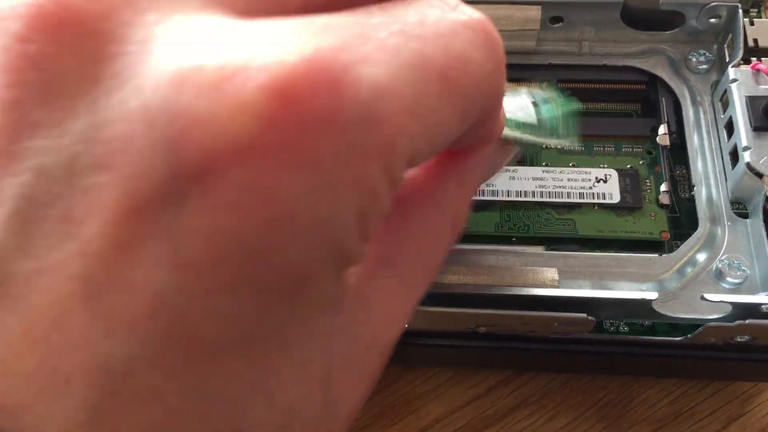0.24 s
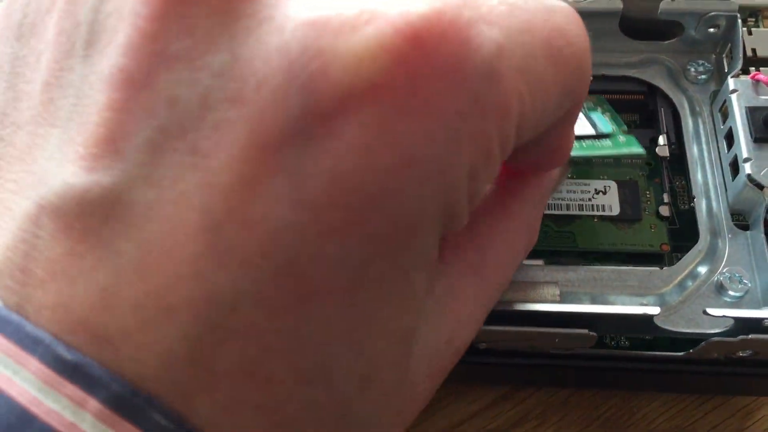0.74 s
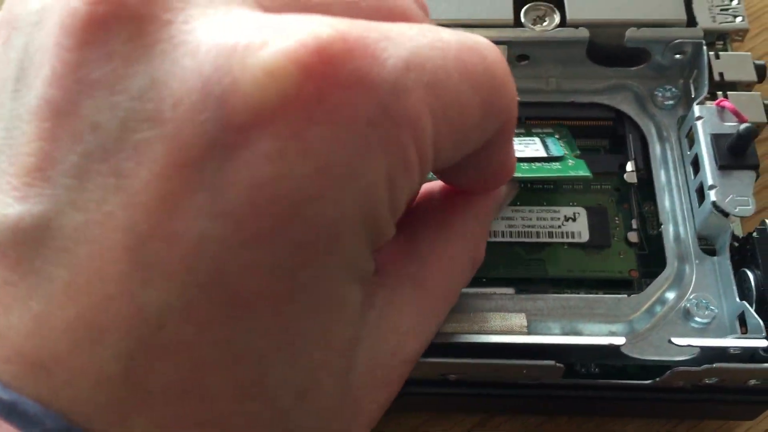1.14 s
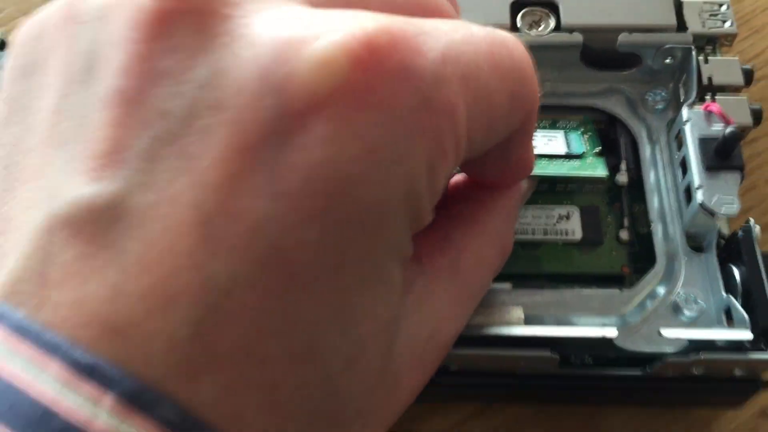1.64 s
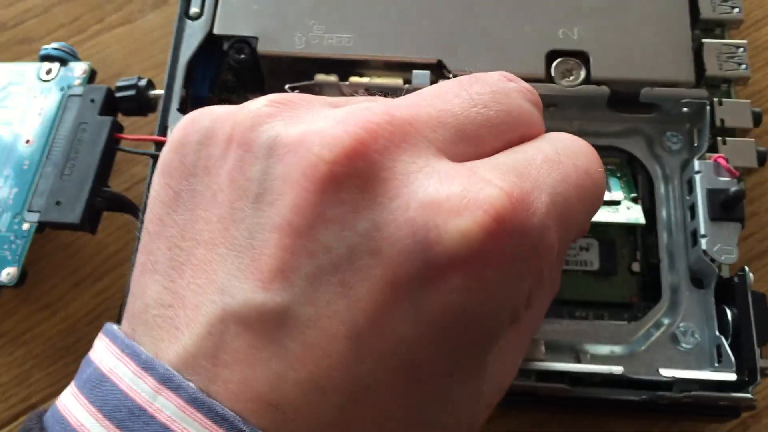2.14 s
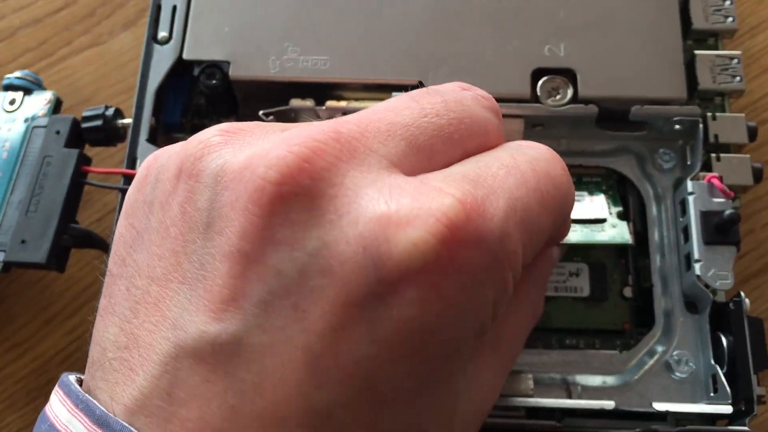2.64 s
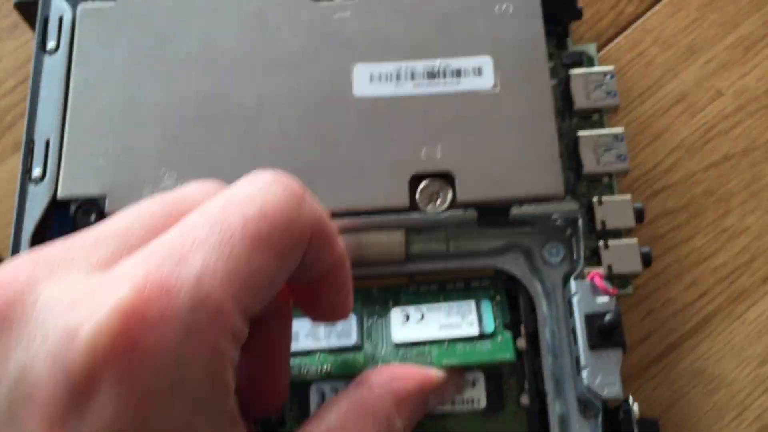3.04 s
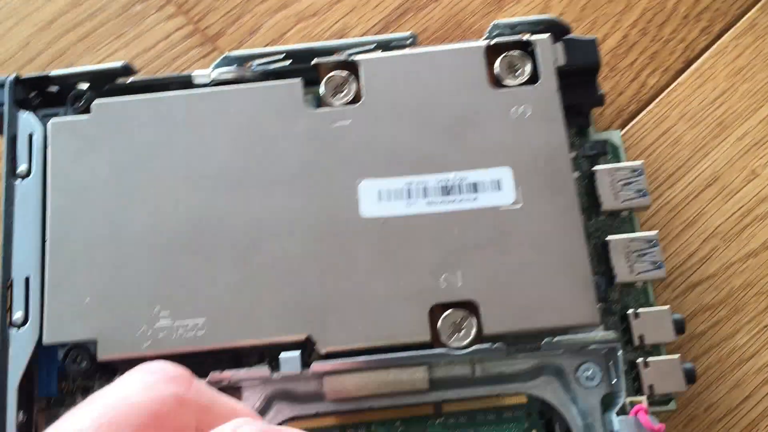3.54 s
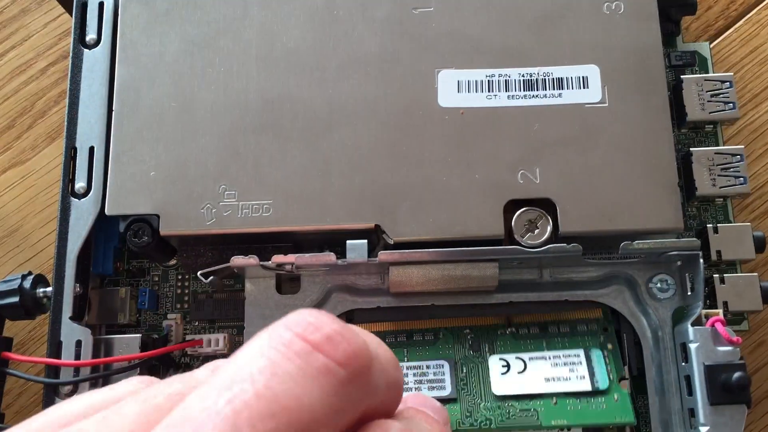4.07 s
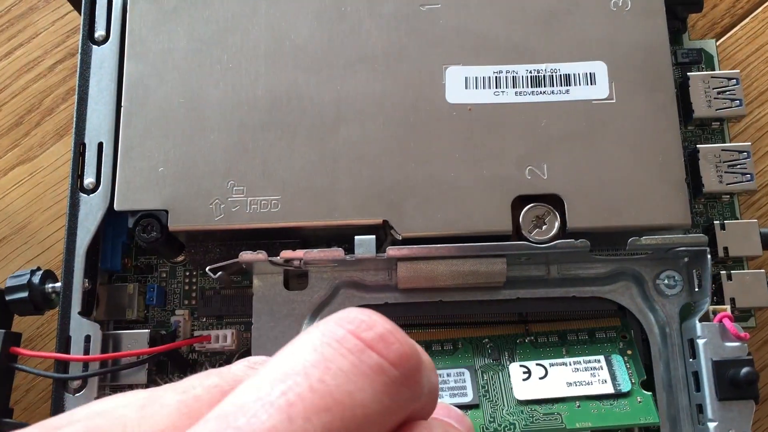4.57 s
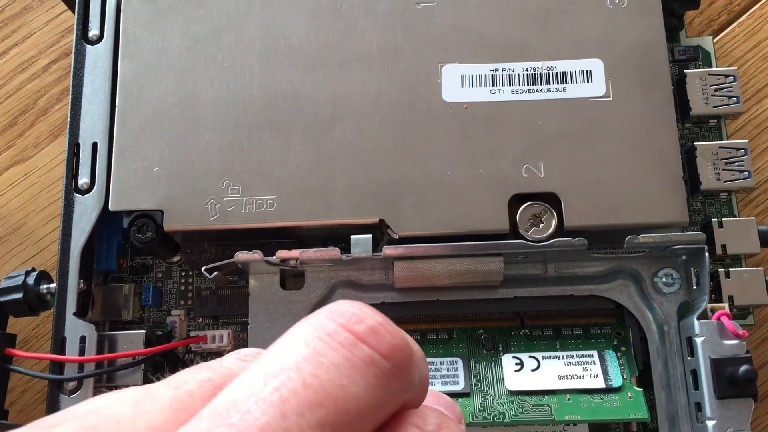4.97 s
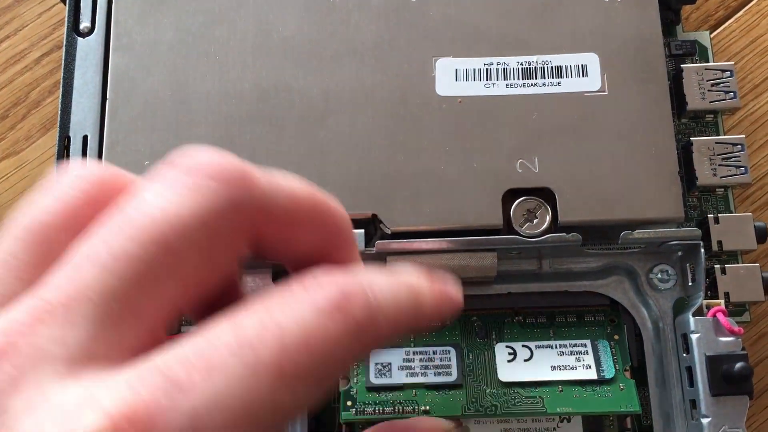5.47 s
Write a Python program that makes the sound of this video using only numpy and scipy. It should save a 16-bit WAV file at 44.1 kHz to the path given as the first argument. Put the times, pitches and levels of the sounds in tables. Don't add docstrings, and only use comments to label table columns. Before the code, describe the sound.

Close, hand-held phone pickup in a small room. A memory module lands with a sharp, loud, ringing clatter and low thump, then sleeve rustle and sparse faint ticks. An edge knocks the slot, taps and scuffs follow, then a bright snap, clustered clacks, rubbing and a final latch click over low steady hum.

```python
import sys
import numpy as np
from scipy import signal
from scipy.fft import rfft, irfft
from scipy.io import wavfile
from scipy.ndimage import uniform_filter1d

SR = 44100
rng = np.random.default_rng(int(sys.argv[2]) if len(sys.argv) > 2 else 0)


def to_wav(sig):
    pcm = np.clip(np.atleast_2d(sig), -1, 1) * 32767
    pcm = np.round(pcm).astype(np.int16)
    wavfile.write(sys.argv[1], SR, pcm.T)


def amplitude_ratio(level_db):
    exponent = np.asarray(level_db, float) / 20
    return 10 ** exponent


N = 251811

# pitch in Hz, level in dB per Hz.
HUM = [(25, -44.5), (38, -31), (52, -6), (120, -9.5), (250, -15), (370, -20.5), (430, -30.5), (540, -30.5),
       (1000, -27), (2200, -35.5), (5000, -45), (10400, -48), (11500, -48.5), (15000, -52.5)]
# pitch in Hz, width in Hz, level in dB.
DRONES = [(53.2, 5.7, -53), (119.5, 32, -60), (288.3, 29.4, -65.5), (347, 20.7, -64.5)]
# time in seconds, level in dB.
DRONE_SWELL = [(0.0, -59), (0.03, -56.5), (0.4, -56.5), (0.48, -52), (0.56, -54), (1.49, -61), (1.57, -52),
               (2.11, -56), (2.18, -53.5), (2.59, -53.5), (2.8, -53.5), (2.81, -56), (4.17, -55),
               (5.37, -58), (5.44, -54), (5.71, -52.5)]
# pitch in Hz, level in dB per Hz.
RUSTLE = [(400, -40.5), (900, 3.5), (2200, 3.5), (4000, -10), (8000, -17), (15000, -23.5)]
# fullest time in seconds, dB over the steady
# rustle, length in seconds.
STROKES = [
    (0.477, 23.5, 0.31),
    (.7, 7.5, 0.35),
    (1.26, 9.5, 0.12),
    (2.538, 3, 0.092),
    (2.926, 6.5, 0.26),
    (3.449, 3.5, 0.22),
    (3.826, 9, 0.25),
    (4.271, 9, 0.23),
    (5.257, 11, 0.31),
    (5.591, 6, 0.17),
]

# start in seconds, case peak in dB, length in ms, tick in dB over the case,
# strongest pitch in Hz. The gold edge scrapes the slot springs:
SCRAPES = [
    (0.098, -76, 22, 21, 13400),
    (0.377, -64, 11, 22, 13700),
    (1.285, -64, 33, 3.3, 6200),
    (4.698, -52.5, 13, 1.9, 5400),
    (5.197, -58, 12.5, 2.3, 5600),
]
# (columns as for scrapes: seconds, dB, ms, dB, Hz).
BRUSHES = [
    (2.52, -57.5, 26, -20, 1250),
    (2.884, -56.5, 30, -8, 1270),
    (5.2, -47, 22, -11.5, 2900),
    (4.255, -56, 62, -3, 1400),
    (.098, -68.5, 22, 5.5, 5050),
]
# (columns as for scrapes: seconds, dB, ms, dB, Hz).
SCUFFS = [(0.19, -66.5, 48, 3.5, 2000), (1.60, -77.5, 39, 15, 12800), (1.629, -50.5, 13, 0, 9100),
          (1.64, -57, 13.5, -12, 1650), (3.231, -63, 19, -5, 1493), (3.255, -60, 18.4, -14, 3000),
          (1.905, -53.5, 16, -5, 2110), (1.955, -67, 83, -6, 1730), (4.712, -59, 40, -18, 1301),
          (4.81, -60, 95, -8, 1360), (5.265, -71, 53, -14, 1300), (3.03, -72.5, 38, 4, 2500),
          (3.82, -59.5, 42, -10.5, 2500), (4.0, -62, 36, -5, 2187), (4.69, -54, 14, -11, 3240),
          (4.782, -47, 12, -3.5, 3550), (5.083, -49, 11.3, -20, 2665), (5.235, -48.5, 24.5, -23, 1365),
          (5.25, -60, 13, -5, 4200), (5.39, -64, 10, -5.5, 2770), (5.455, -61, 105, -8, 2840),
          (1.28, -59.5, 48, -7, 3150)]
# (columns as for scrapes: seconds, dB, ms, dB, Hz).
RUBS = [
    (0.398, -75, 9.7, -28, 2000),
    (1.272, -54.5, 55, -18.5, 1620),
    (4.174, -45, 5.8, -29.5, 1410),
    (4.38, -55.5, 51, -23, 1335),
    (4.455, -54, 37, -19, 1254),
    (4.655, -48, 86, -15.5, 1402),
    (5.118, -59, 30, -20, 1290),
    (5.17, -56, 29, -17, 1330),
]

# start in seconds, case peak in dB, board in dB over the case, tick in dB over the case,
# strongest pitch in Hz. Light taps:
TAPS = [(0.108, -57, 3, 18, 4800), (.3815, -54.5, 3, 10, 6370), (1.212, -54, -0.5, -22.5, 2020),
        (1.811, -53.5, -4, -18, 2036), (2.891, -48, 0.5, -7, 2620), (3.249, -46.5, 4, -1, 3000),
        (3.752, -57, 0, -16.5, 2460), (3.811, -57.5, 3, -15, 2500), (3.934, -58.5, -1.5, -23, 2500),
        (4.045, -56, -2, -20.5, 2500), (4.055, -52.5, 9, -22, 2640), (4.121, -52.5, -1.5, -2, 3040),
        (5.326, -49, 0, -3.5, 3260), (5.558, -68.5, 14, -23, 2880), (5.603, -57, 5.5, 2.5, 2900)]
# (columns as for taps: seconds, dB, dB, dB, Hz).
DROP = [
    (0.4103, -19, -1, 12, 2055),
    (.4175, -21.5, -10, -21.5, 1516),
    (.4265, -28.5, -17, -19, 1324),
]
# (columns as for taps: seconds, dB, dB, dB, Hz).
REBOUND = [
    (0.4111, -12.5, -5.5, -5, 1795),
    (0.4138, -20, -7, -9, 1552),
]
# (columns as for taps: seconds, dB, dB, dB, Hz).
PINS = [
    (1.6315, -61.5, 6, 12, 13200),
    (1.638, -60, 4, 9, 13500),
    (3.7, -69, 0, 8, 6200),
    (1.927, -49, 6.5, -12, 4480),
]
# (columns as for taps: seconds, dB, dB, dB, Hz).
EDGE = [
    (1.927, -33.5, -6.5, 0.5, 4520),
    (1.933, -39.5, -24, -16, 1653),
    (1.947, -45.5, -8, -8, 1868),
]
# (columns as for taps: seconds, dB, dB, dB, Hz).
PRESS = [(2.524, -52.5, -15, -23, 1321), (4.1685, -41, -21.5, -27.5, 2052), (4.176, -41, -28, -37, 1300),
         (4.258, -33, -27, -30, 1330), (4.318, -38.5, -9, -13, 1320), (4.378, -51.5, -21, -27, 1380),
         (4.459, -52.5, -23, -20.5, 1245), (4.65, -56, -18, -10, 1406), (4.836, -32, -12.5, -9.5, 1350),
         (4.866, -44, -20, -13, 1360), (4.897, -45, -18, -31, 1210)]
# (columns as for taps: seconds, dB, dB, dB, Hz).
SNAP = [
    (4.2433, -37.5, 1, 4.5, 3289),
    (4.2456, -24, -5, -7.5, 1324),
    (4.2485, -28.5, -15.5, -7, 1631),
    (4.251, -33, -6.5, -14, 1324),
]
TILT = [
    (4.7073, -30, -1.5, -11, 3537),
    (4.7095, -33, 0.5, -20, 1227),
    (4.7118, -31.5, -10, -20, 1227),
    (4.719, -39, -16, -19.5, 1610),
]
SEAT = [
    (4.7937, -35, 2.5, 9, 3526),
    (4.7965, -34, 1.5, 0, 1540),
    (4.8005, -31.5, -9, -12, 1540),
    (4.8075, -39, -21.5, -28, 1351),
]
CLACK = [
    (5.1002, -24.5, -6, -10.5, 1599),
    (5.1035, -34.5, -7.5, -19, 1599),
    (5.108, -26, -18, -32, 1227),
    (5.1195, -41, -16, -22, 1300),
]
# (columns as for taps: seconds, dB, dB, dB, Hz).
ROCK = [
    (5.15, -39, -5, -7.5, 1330),
    (5.16, -39.5, -33, -28, 1400),
    (5.198, -39.5, -12, -17, 1380),
    (5.213, -35.5, -7, -17, 1330),
    (5.258, -33.5, -6, -13, 1337),
    (5.267, -44, -17, -20, 1430),
]
# (columns as for taps: seconds, dB, dB, dB, Hz).
LATCH = [
    (5.3965, -41, 2, 3, 2840),
    (5.3988, -25.5, 3.5, 6.5, 2830),
    (5.4035, -30.5, -6, -14, 852),
    (5.408, -33, -14, -21.5, 1730),
]

# pitch in Hz, level in dB,
# time to fall by 60 dB in seconds.
TAP_MODES = [(861, -9.5, 0.028), (1330, -6.5, 0.044), (1650, -10.5, 0.091), (2000, -9.5, 0.073),
             (2500, -7.5, 0.025), (3000, -3.5, 0.024), (3430, -11, 0.046), (4200, -10.5, 0.022)]
DROP_MODES = [(360, -11, .1), (658, -14, 0.1), (845, -13, 0.084), (1118, -11.5, 0.078), (1324, -4, 0.071),
              (1540, 1, 0.054), (1770, -13.5, 0.1), (2026, -8, 0.087), (2311, -15, 0.057),
              (2490, -17, 0.05), (2810, -17, 0.056), (2980, -16.5, 0.069), (3289, -13, 0.036),
              (3540, -17.5, 0.023), (3914, -17.5, .03), (4200, -10.5, 0.02)]
EDGE_MODES = [(670, -29.5, 0.29), (840, -15.5, 0.14), (1240, -17.5, 0.09), (1405, -4.5, 0.022),
              (1653, -7, 0.035), (1868, -11.5, 0.035), (2280, -25.5, 0.044), (2770, -28.5, 0.15),
              (3060, -28, 0.044), (3390, -38, 0.076), (3440, -31, 0.03), (3720, -25, 0.021),
              (4570, -26, 0.029), (4840, -19.5, 0.012)]
PRESS_MODES = [(716, -20, 5.0), (840, -10, 0.088), (1330, 0, 0.025), (1706, -6.5, 0.041),
               (1706, -16, 0.056), (1853, -5.5, 0.13), (2250, -5, 0.014), (2200, -34, 0.11),
               (2350, -42.5, 0.071), (2670, -10, 0.09), (3010, -9, 0.029), (3220, -4, 0.03),
               (3960, -11, 0.011), (4140, -41, 0.046), (4330, -40, 0.073), (5100, -12.5, 0.017)]
SNAP_MODES = [(680, -10.5, 0.057), (888, 0.5, 0.039), (1324, -2, 0.023), (1631, -3, 0.03), (1895, 5, 0.056),
              (2170, -27, 0.15), (2500, -19, 0.066), (2630, 0, 0.028), (2815, -8, 0.028),
              (3289, -2.5, 0.031), (3750, -23, 0.11), (4310, -13, 0.027), (4650, -24, 0.048),
              (4930, -22, 0.022)]
TILT_MODES = [(840, -6.5, 0.087), (1227, -3, 0.063), (1610, -3, 0.11), (1886, 1, 0.049), (2560, 0, 0.037),
              (2770, -28, 0.28), (2961, -31, 0.081), (3537, -4, 0.014), (3720, -23, 0.036),
              (3850, -22, 0.047), (4030, -23, 0.047), (4230, -15, 0.032), (4608, -34, 0.046),
              (4850, -28, 0.05)]
SEAT_MODES = [(680, -42, 5.0), (851, -13.5, 0.18), (1351, -13, 0.12), (1540, 0.5, 0.032), (1720, -4, 0.044),
              (1920, -8, 0.1), (2670, -4, 0.027), (3000, -26, 0.037), (3150, -13, 0.037), (3400, -9, 0.014),
              (3526, -16, 0.049), (3850, -32, 0.088), (4730, -15, 0.022), (4797, -31, 0.04)]
CLACK_MODES = [(707, -10.5, 5.0), (1028, 0, 0.067), (1227, -1, 0.058), (1599, -0.5, 0.025),
               (2062, -4, 0.018), (2440, -5.5, 0.013), (2780, -10.5, 0.022), (2870, -18, 0.044),
               (3130, -9.5, 0.044), (3650, -12, 0.028), (3740, -22, 0.033), (3870, -18, 0.029),
               (4300, -14.5, 0.029), (4900, -34, 0.05)]
ROCK_MODES = [(725, -16.5, 5.0), (1030, -3.5, 0.13), (1230, -5, 0.089), (1604, -1.5, 0.028),
              (1744, -2, 0.024), (2120, 1.5, 0.0076), (2640, -5, 0.009), (3040, -18, 0.016),
              (2930, -24, 0.021), (3400, -9, 0.014), (3800, -18, 0.014), (3900, -26, 0.021),
              (4260, -16, 0.011), (4900, -35, 0.042)]
LATCH_MODES = [(695, -21, .1), (852, -3, 0.039), (996, -5.5, 0.057), (1216, -7.5, .1), (1600, -12, 0.041),
               (1670, -4, 0.045), (1846, 2, 0.046), (2040, -5, 0.075), (2330, -7, .04), (2590, -3, .032),
               (2825, 2, 0.029), (3200, -6, 0.029), (3537, -17, 0.043), (3900, -18, .05),
               (3980, -18, 0.042), (4520, -6.5, 0.042)]

# pitch in Hz, level in dB.
PRESS_TICK = [(5000, -54), (5820, -17), (7730, -19.5), (9340, -17), (10400, -16.5), (13600, -25.5),
              (15000, -25.5)]
EDGE_TICK = [(2940, -34), (5000, -17.5), (5550, 0), (8140, -22.5), (8990, -1), (9890, -0.5), (12500, -0.5),
             (15500, -30)]
DROP_TICK = [(5000, -23.5), (5800, -13.5), (7200, -7), (9000, -0.5), (10500, 5.5), (11400, 4.5),
             (12400, -14), (15000, -10.5)]
SNAP_TICK = [(5000, -12), (5300, 0), (6500, -3), (7600, -2.5), (9800, -1), (11000, -13), (13400, 4),
             (15000, -14)]
LATCH_TICK = [(5000, -18), (5400, -25), (5850, -12), (6400, -5), (7000, -9), (9100, -2.5), (10400, -15.5),
              (15000, -17)]

# pitch in Hz, time to fall by 60 dB in seconds.
ROOM_FALL = [(250, 0.26), (700, 0.25), (1500, 0.24), (3000, 0.55), (6000, 0.28), (12000, 0.41)]
# pitch in Hz, level in dB.
ROOM_COLOUR = [(300, 15), (1500, 7), (3000, -4.5), (5500, -2.5), (9000, -4), (12000, -9), (15000, 0)]
# start in seconds, level in dB, pitch in Hz,
# time to fall by 60 dB in seconds.
THUMPS = [(.413, -31, 355, .11), (.414, -41, 520, .05), (.412, -36.5, 92, .12), (.42, -43, 170, .15),
          (.46, -41, 403, .033), (.48, -47.5, 350, .27), (.49, -43.5, 140, .11), (1.575, -34, 96, .056),
          (4.4435, -36, 110, .035), (4.801, -51, 430, .058), (4.9, -45, 370, .02), (5.102, -47, 700, .059),
          (5.29, -37, 99, .08), (5.404, -47, 432, .07), (5.4095, -34, 95, .09), (5.411, -42, 232, .054)]
# start in seconds, level in dB, pitch in Hz,
# time to fall by 60 dB in seconds.
COVER_RINGS = [(0.413, -47, 1525, 0.71), (.412, -54.5, 1645, 0.8), (0.412, -50.5, 1320, 0.69),
               (.412, -54, 2062, 0.72), (.412, -54, 2000, 0.76), (.412, -58, 1720, 0.85),
               (.412, -53, 853, 0.24), (0.414, -55.5, 1170, 0.53), (.412, -56.5, 3050, 0.49),
               (.412, -65, 2490, .5), (.412, -47, 583.3, 0.23), (1.93, -54, 851, 0.2),
               (4.246, -47, 840, 0.16), (4.246, -52.5, 1368, 0.48), (4.247, -65, 1720, .4),
               (4.795, -54, 1270, 0.43), (5.401, -55.5, 851, 0.31), (5.401, -59.5, 1744, 0.58),
               (5.401, -60, 1840, 0.66), (5.401, -69, 2815, 0.66), (5.401, -67, 2390, .3),
               (5.401, -64.5, 1420, 0.46)]

BOARD_HZ, TICK_HZ = 2300, 5000


def evened(x):
    return x / np.sqrt(np.mean(x ** 2) + 1e-30)


def peaked(x):
    return x / (abs(x).max() + 1e-30)


def read(points, hz):
    f, value = np.transpose(points)
    return np.interp(np.log(hz + 1), np.log(f + 1), value)


def add(mix, s, sound):
    part = mix[round(s * SR):][:len(sound)]
    part += sound[:len(part)]


def noise(spectrum_db, patchy_db, size):
    a, b, patches = rng.standard_normal((4 * N // size + 5, size // 2 + 1, 3)).T
    patches = uniform_filter1d(patches, size=12, axis=0)
    patches = evened(uniform_filter1d(patches, size=6, axis=1))
    colour_db = spectrum_db(np.fft.rfftfreq(size, 1 / SR))[:, None]
    z = (a + 1j * b) * amplitude_ratio(colour_db + patchy_db * patches)
    return evened(signal.istft(z, nperseg=size, noverlap=3 * size // 4)[1][:N])


def drone_colour(hz):
    humps = [amplitude_ratio(2 * db) / width / (1 + (2 * (hz - f) / width) ** 4) for f, width, db in DRONES]
    return 10 * np.log10(sum(humps))


def background():
    t = np.arange(N) / SR
    hum = amplitude_ratio(-58) * noise(lambda hz: read(HUM, hz), 1.9, size=4096)
    swell = amplitude_ratio(np.interp(t, *np.transpose(DRONE_SWELL)) + 2.0)
    drones = swell * noise(drone_colour, 0.93, size=8192)
    rustle_db = -79.5
    for s, db, length in STROKES:
        rustle_db = rustle_db + db * np.exp(-(2 * (t - s) / length) ** 2)
    rustle = amplitude_ratio(rustle_db) * noise(lambda hz: read(RUSTLE, hz), 0.94, size=1024)
    return hum + drones + rustle


def ring(modes, rise_s, loose):
    hz, db, t60 = np.repeat(modes, 3, axis=0).T[:, :, None]
    side = np.arange(len(hz))[:, None] % 3 - 1
    split = loose * (side + rng.uniform(-.5, .5, hz.shape) * (.3 + abs(side)))
    t60 = np.minimum(t60, .075)
    t = np.arange(int(.8 * SR * t60.max())) / SR
    level = amplitude_ratio(db - 5 * abs(side) - 60 * t / t60)
    bunch = level * np.sin(2 * np.pi * hz * (1 + split) * t)
    return bunch.sum(0) * (1 - np.exp(-t / rise_s))


def smeared(sound, blur_hz):
    power = uniform_filter1d(abs(rfft(sound, 8192)) ** 2, int(blur_hz * 8192 / SR))
    pulse = irfft(np.sqrt(abs(power)))
    return np.roll(pulse, 200)[:400] * np.hanning(400)


def contact(case_db, board_db, tick_db, ms, strong_hz, modes, tick, sliding):
    place, size = rng.random((2, 90 if sliding else 14))
    if not sliding:
        firm = case_db > -36
        place[0], size[0] = 0, 0.3 + 0.55 * firm
    tick_hz = np.geomspace(TICK_HZ, 15000, num=16)
    tick_t60 = 0.01 * 9000 / tick_hz
    ticks = np.transpose([tick_hz, read(tick, tick_hz), tick_t60])
    # tones, level in dB, lowest and highest Hz, rise in seconds, fade over the rattle in dB.
    layers = ((modes, 0, 0, BOARD_HZ, .001, -6.),
              (modes, board_db, BOARD_HZ, TICK_HZ, .0003, -12.),
              (ticks, tick_db, TICK_HZ - 1, SR, .0001, -22.))
    loose = .012 if sliding else .028
    near, far = np.zeros((2, 9000))
    for group, db, low, high, rise_s, fade_db in layers:
        part = [m for m in group if low <= m[0] < high]
        if low <= strong_hz < high:
            strong_db = max(m[1] for m in part) + 3.4 + 4 * sliding
            part.append((strong_hz, strong_db, min(.036, 110 / strong_hz)))
        shape = np.sin(np.pi * place) ** 0.33 if sliding else amplitude_ratio(fade_db * place)
        at = (place * abs(ms) * SR / 1000).astype(int)
        rattle = np.bincount(at, (size - .5) * shape)
        sound = peaked(signal.fftconvolve(rattle, ring(part, rise_s, loose)))
        sound = amplitude_ratio(case_db + db) * sound
        add(near, 0, sound)
        add(far, 0, sound if sliding else smeared(sound, 120 + low * low / 9000))
    return near, far


def slides(rows, board_db, tick):
    near, far = sounds = np.zeros((2, N))
    for s, case_db, ms, tick_db, hz in rows:
        close, walls = contact(case_db, board_db, tick_db, ms, hz, TAP_MODES, tick, sliding=True)
        add(near, s, close)
        add(far, s, walls)
    return sounds


def hits(rows, ms, modes, tick):
    near, far = sounds = np.zeros((2, N))
    for s, case_db, board_db, tick_db, hz in rows:
        close, walls = contact(case_db, board_db, tick_db, ms, hz, modes, tick, sliding=False)
        add(near, s, close)
        add(far, s, walls)
    return sounds


def module():
    drop = hits(DROP, 3.5, DROP_MODES, DROP_TICK)
    slot = hits(PRESS, 9, PRESS_MODES, PRESS_TICK)
    slot += hits(ROCK, 10, ROCK_MODES, PRESS_TICK)
    slot += hits(LATCH, 2.31, LATCH_MODES, LATCH_TICK)
    slot += hits(TAPS, 6, TAP_MODES, PRESS_TICK)
    slot += hits(SNAP, 2.2, SNAP_MODES, SNAP_TICK)
    slot += hits(TILT, 2.2, TILT_MODES, PRESS_TICK)
    slot += hits(SEAT, 2.2, SEAT_MODES, EDGE_TICK)
    slot += hits(CLACK, 2.2, CLACK_MODES, PRESS_TICK)
    slot += hits(EDGE, 4.5, EDGE_MODES, EDGE_TICK)
    slot += slides(RUBS, -15, EDGE_TICK)
    slot += slides(SCUFFS, -0.5, EDGE_TICK)
    slot += slides(SCRAPES, 8, EDGE_TICK)
    drop += hits(REBOUND, 2.2, DROP_MODES, DROP_TICK)
    slot += slides(BRUSHES, -10.5, PRESS_TICK)
    slot += hits(PINS, 2.2, TAP_MODES, PRESS_TICK)
    drop_walls = amplitude_ratio(1.5) * signal.lfilter([1 + 0.057, -0.057], 1, drop[1])
    slot_walls = amplitude_ratio(-2) * slot[1]
    return np.array([drop[0] + slot[0], drop_walls + slot_walls])


def room(x):
    echoes = np.zeros((3, 30100))
    at = np.arange(80, 30000, 20) + rng.integers(0, 20, (3, 1496))
    np.put_along_axis(echoes, at, rng.choice([-1., 1.], at.shape), 1)
    hz, t, z = signal.stft(echoes, SR, nperseg=256)
    fall_db = 60 * t / read(ROOM_FALL, hz)[:, None]
    level = amplitude_ratio(read(ROOM_COLOUR, hz)[:, None] - fall_db)
    tail = signal.istft(z * level, SR, nperseg=256)[1]
    tail = tail / np.linalg.norm(tail[0])
    cycles = np.arange(N) / SR * 2.3 + np.arange(3)[:, None] / 3
    turn = np.cos(2 * np.pi * cycles) * np.sqrt(2 / 3)
    return signal.fftconvolve(x * turn, tail, axes=1).sum(0)[:N]


def thumps():
    mix, t = np.zeros(N), np.arange(12000) / SR
    for s, db, hz, t60 in THUMPS:
        level = amplitude_ratio(db - 60 * t / t60) * (1 - np.exp(-t / 0.0015))
        add(mix, s, level * np.sin(2 * np.pi * hz * t))
    return mix


def cover():
    mix, t = np.zeros(N), np.arange(20000) / SR
    for s, db, hz, t60 in COVER_RINGS:
        above, below = 30.1 * rng.uniform(.4, 1.6, size=2)
        partners = np.sin(2 * np.pi * (hz + above) * t) + np.sin(2 * np.pi * (hz - below) * t)
        bunch = np.sin(2 * np.pi * hz * t) + amplitude_ratio(-1) * partners
        level = amplitude_ratio(db - 60 * t / t60) * (1 - np.exp(-t / 0.0066))
        add(mix, s, level * bunch)
    return mix


def scene():
    around = background()
    near, far = module() + thumps() + cover()
    return (near + amplitude_ratio(-14.5) * room(far) + around)[None]


def low_pass(x):
    return signal.sosfilt(signal.butter(12, 16530, fs=SR, output="sos"), x)


def record(dry):
    b, a = signal.iirnotch(10380, 14, SR)
    heard = 0.39 * dry + 0.59 * signal.lfilter(b, a, dry)
    treble_limit = signal.firwin(127, 15400, window=("kaiser", 3.5), fs=SR)
    mix = signal.oaconvolve(heard, treble_limit[None], "same")
    return low_pass(mix)


dry = scene()
out = record(dry)
to_wav(out)
```